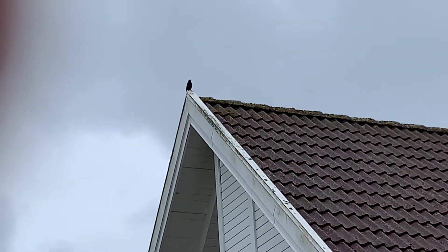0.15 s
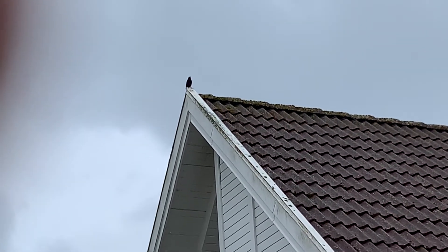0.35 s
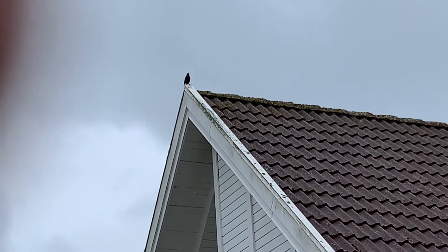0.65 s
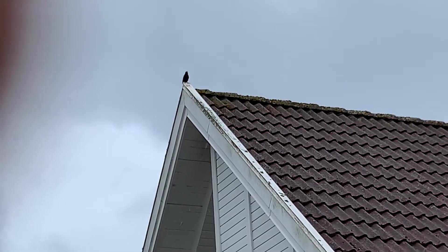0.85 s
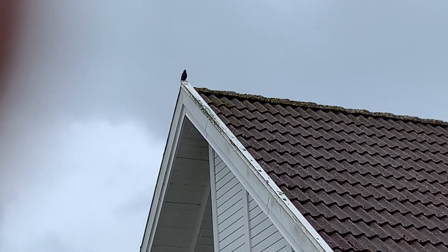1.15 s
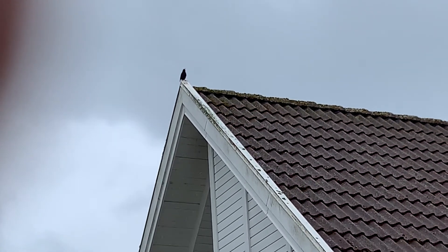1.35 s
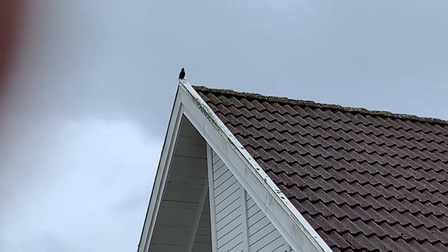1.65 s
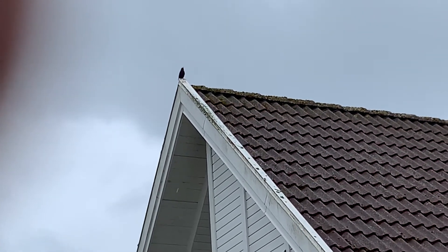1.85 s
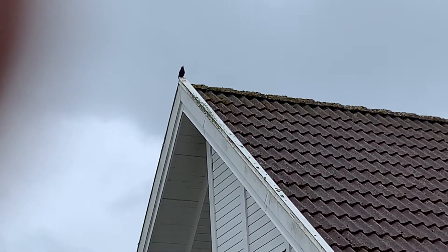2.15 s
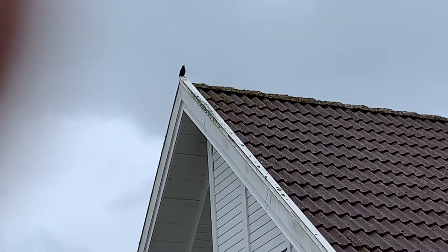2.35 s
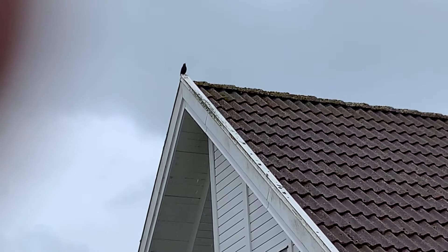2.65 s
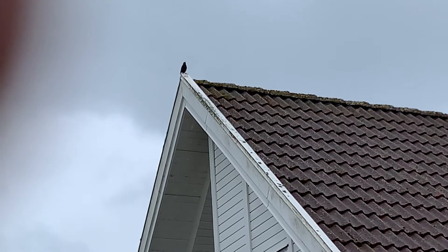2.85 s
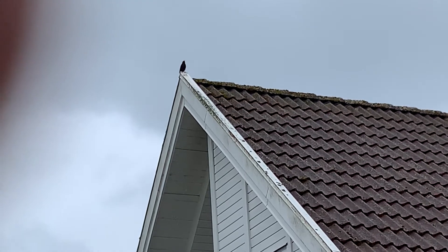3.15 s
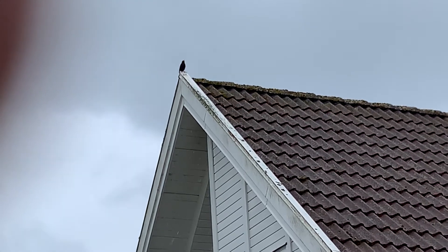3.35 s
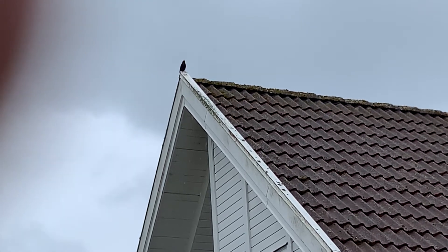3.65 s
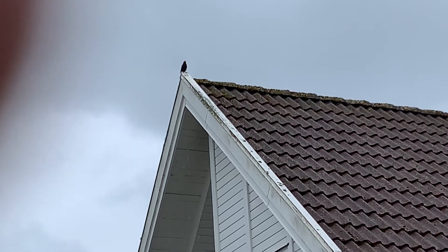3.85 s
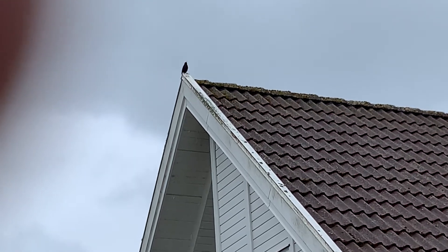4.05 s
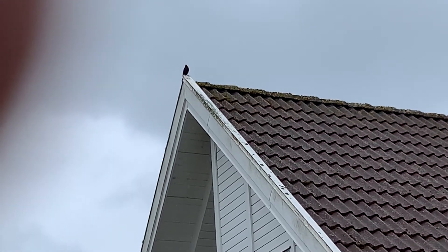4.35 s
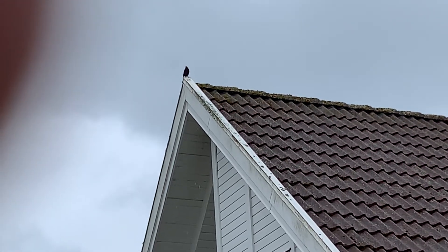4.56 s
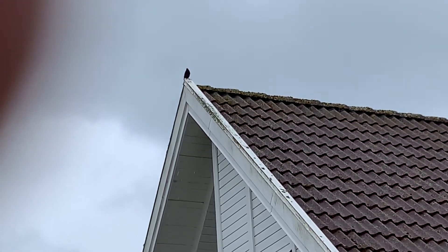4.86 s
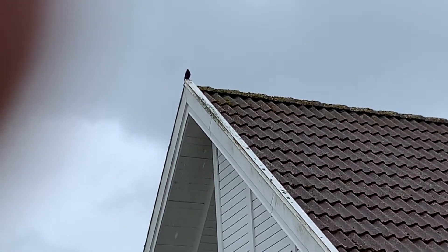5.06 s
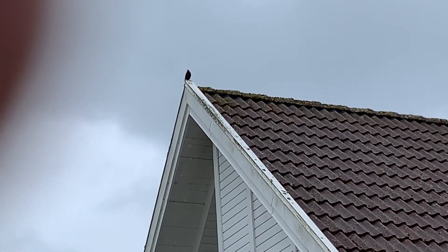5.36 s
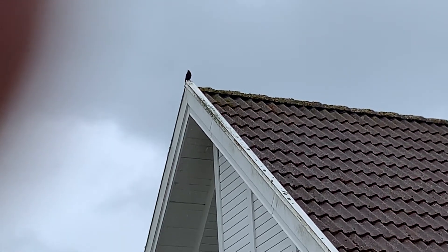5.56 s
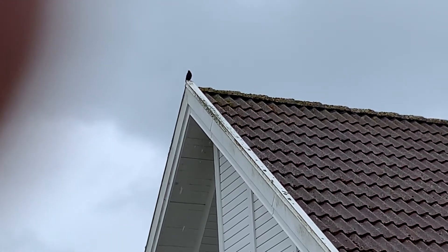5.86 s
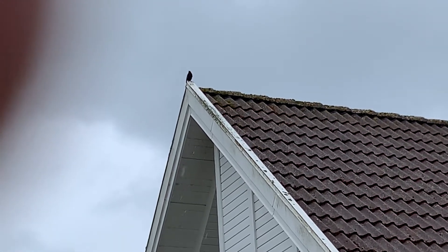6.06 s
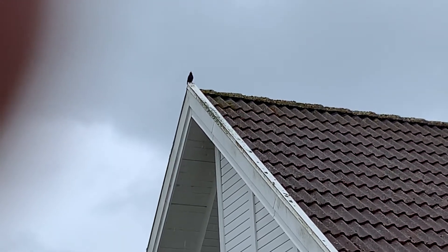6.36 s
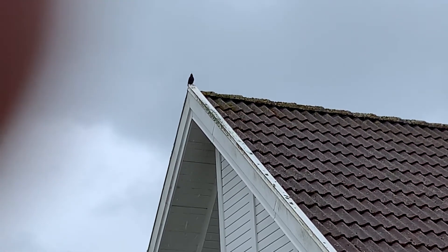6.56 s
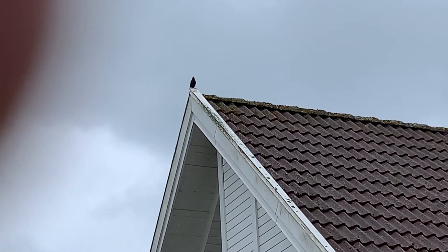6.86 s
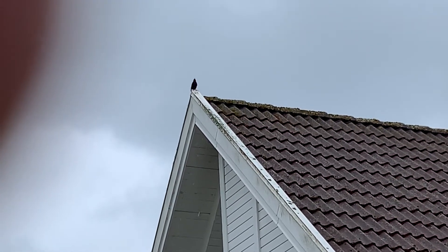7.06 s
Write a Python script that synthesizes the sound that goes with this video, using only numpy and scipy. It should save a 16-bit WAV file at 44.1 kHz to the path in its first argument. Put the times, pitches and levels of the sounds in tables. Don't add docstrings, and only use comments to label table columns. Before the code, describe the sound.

Mellow blackbird song in separated phrases with a brief high twitter, distant chirps echoing off houses, and low wind thumps growing stronger later.

```python
import sys
import numpy as np
from scipy import signal
from scipy.fft import rfft, irfft, next_fast_len
from scipy.io import wavfile
from scipy.ndimage import uniform_filter1d, map_coordinates

SR = 44100
rng = np.random.default_rng(int(sys.argv[2]) if len(sys.argv) > 2 else 0)


def boost_factor(decibels):
    exponent = np.asarray(decibels, float) / 20
    return 10 ** exponent


def int16_out(signal):
    q = np.round(np.clip(np.atleast_2d(signal).T, -1, 1) * 32767)
    wavfile.write(sys.argv[1], SR, q.astype(np.int16))


N = 317520


def unit(x):
    return x / np.sqrt(np.mean(x ** 2) + 1e-20)


def along(points, hz):
    f, v = np.transpose(points)
    return np.interp(np.log(hz + 1), np.log(f + 1), v)


def curves(rows, t):
    s, *cols = np.transpose(rows)
    return [np.interp(t, s, c) for c in cols]


def wobble(rate_hz, size=N):
    knots = rng.standard_normal(int(size * rate_hz / SR) + 4)
    return map_coordinates(knots, [np.arange(size) * rate_hz / SR])


def filtered(x, response):
    m = next_fast_len(x.shape[-1] + 8192)
    spectrum = rfft(x, m) * response(np.fft.rfftfreq(m, 1 / SR))
    return irfft(spectrum, m)[..., :x.shape[-1]]


def coloured(shape, colour):
    return filtered(rng.standard_normal(shape), lambda hz: boost_factor(along(colour, hz)))


def add(track, x, s):
    part = track[..., round(s * SR):][..., :x.shape[-1]]
    part += x[..., :part.shape[-1]]


def span(rows):
    return np.arange(rows[0][0], rows[-1][0], 1 / SR)


def edges(x):
    return x * signal.windows.tukey(len(x), min(0.0013 * SR / len(x), 1))


# f/Hz, level/dB per Hz
TOWN_COLOUR = [(150, -10.5), (250, -6.5), (595, -18.5), (887, -7.5), (1150, -13.5), (1840, -16.5),
               (2690, -21.5), (3680, -23.5), (5000, -30), (6400, -35), (8500, -36.5), (11000, -32),
               (12500, -30.5), (13800, -53.5), (15800, -50)]
# f/Hz, share [0-1]
TOWN_SHARE = [(300, 0.97), (700, 0.026), (3000, 0.043), (6000, 0.4), (8500, 0.39)]
# t/s, level/dB
TOWN_LEVEL = [(0.0, -71.5), (0.14, -72), (3.35, -73.5), (4.77, -75.5), (5.15, -74), (5.9, -76.5),
              (7.2, -71.5)]


def town():
    def share(hz):
        return np.clip(along(TOWN_SHARE, hz), 0, 1)

    def gain(hz):
        return boost_factor(along(TOWN_COLOUR, hz))

    shared = filtered(rng.standard_normal(N), lambda hz: gain(hz) * np.sqrt(share(hz)))
    own = filtered(rng.standard_normal((2, N)), lambda hz: gain(hz) * np.sqrt(1 - share(hz)))
    level_db = curves(TOWN_LEVEL, np.arange(N) / SR)[0] + 5 + 0.33 * wobble(2.3)
    return boost_factor(level_db) * unit(shared + own)


# t/s, level/dB
WIND_LEVEL = [(0.0, -65), (0.2, -50), (0.7, -65.5), (1.1, -51), (1.58, -56), (2.55, -60.5), (3.31, -48.5),
              (3.57, -56.5), (4.01, -56), (4.53, -47.5), (4.79, -43), (5.11, -58.5), (5.31, -40),
              (5.45, -32.5), (5.54, -33.5), (6.13, -41), (6.48, -43), (7.2, -41.5)]
# t/s, peak level/dB
GUST_PEAKS = [(.03, -50.5), (.29, -36), (0.891, -52.5), (1.398, -44.5), (1.69, -37.5), (1.88, -43.5),
              (2.222, -45), (3.331, -47.5), (4.2, -46), (4.389, -45), (4.581, -39), (4.95, -44),
              (5.101, -40), (5.369, -31), (6.24, -39), (6.401, -43), (6.56, -29), (6.66, -29.5),
              (6.72, -32), (6.93, -32), (7.2, -28.5)]
# t/s, peak level/dB, f/Hz
EDDIES = [(0.271, -38.5, 79), (0.305, -33.5, 58.4), (0.421, -54.5, 110.7), (1.094, -29.5, 74.2),
          (0.878, -47, 60), (1.363, -53, 79.7), (1.665, -50.5, 83), (3.255, -51, 94), (3.488, -46.5, 66),
          (4.169, -47.5, 64.5), (4.555, -49.5, 74.5), (4.832, -46, 74.9), (1.709, -32.5, 67),
          (2.218, -31.5, 86.4), (4.348, -50, 71.1), (5.091, -45.5, 91.4), (5.263, -34.5, 86.6),
          (5.282, -32.5, 77.7), (5.338, -30, 90), (5.407, -42, 125), (5.467, -35, 150), (5.486, -38.5, 120),
          (5.548, -42.5, 85), (5.833, -32.5, 148), (6.153, -56.5, 150), (6.225, -32, 76),
          (6.265, -48, 130.4), (7.016, -50.5, 147.4), (7.138, -44.5, 130), (5.437, -28, 93),
          (5.529, -35.5, 86.1), (5.604, -33, 91), (5.653, -28, 61.3), (5.691, -41, 62), (5.755, -27, 152.8),
          (5.816, -29, 89), (5.898, -30, 72.7), (6.034, -45, 62.5), (6.168, -33, 80), (6.488, -31, 146),
          (6.531, -29.5, 107), (6.588, -36, 128), (6.704, -33, 85.2), (6.79, -45, 88), (6.864, -63, 98),
          (6.94, -73.5, 84), (7.113, -55, 96.9), (7.169, -31.5, 117)]
# f/Hz, level/dB per Hz
BUFFET_COLOUR = [(11, -48), (18, -25), (48, 1.5), (70, 2.5), (100, -5), (146, -15.5), (200, -22),
                 (260, -57.5), (440, -120)]
# f/Hz, level/dB per Hz
FLUTTER_COLOUR = [(59, -33.5), (100, -4), (254, -10), (389, -26.5), (580, -48.5), (708, -64), (800, -67),
                  (1040, -101.5), (1760, -120)]


def buffeting(grid_s, steady_db):
    rise_db_s, fall_db_s = 182, 302
    low = coloured(N, BUFFET_COLOUR)
    swell = np.sqrt(np.abs(uniform_filter1d(unit(low) ** 2, size=1500)))
    low = low / (.35 + swell)
    s, db = np.transpose(GUST_PEAKS)[..., None]
    slope_db_s = np.where(grid_s < s, rise_db_s, fall_db_s)
    gusts = boost_factor(db - np.abs(grid_s - s) * slope_db_s)
    strength = boost_factor(steady_db) + gusts.sum(axis=0)
    return np.interp(np.arange(N) / SR, grid_s, strength) * unit(boost_factor(5.76 * wobble(14)) * low)


def flutter(grid_s, steady_db):
    base_db, growth = -59, 2.6
    stir_db, stir_tilt = -10.5, 1.7
    fast = coloured((3, N), FLUTTER_COLOUR)
    s, db, hz = np.transpose(EDDIES)[..., None]
    decay_s = np.where(grid_s < s, .004, .016)
    stirred = boost_factor(db + stir_db) * (hz / 90) ** stir_tilt * np.exp(-np.abs(grid_s - s) / decay_s)
    strength = boost_factor(base_db + growth * (steady_db + 39)) + stirred.sum(axis=0)
    noise = unit(boost_factor(2.2 * wobble(45)) * (fast[0] + 0.45 * fast[1:]))
    return np.interp(np.arange(N) / SR, grid_s, strength) * noise


def wind():
    grid_s = np.arange(0, N / SR, .001)
    steady_db, = curves(WIND_LEVEL, grid_s)
    out = buffeting(grid_s, steady_db) + flutter(grid_s, steady_db)
    t = np.arange(-.02, .06, 1 / SR)
    side = np.array([[.45], [-.45]])
    for (s, db, hz), (turn, lean) in zip(EDDIES, rng.standard_normal((len(EDDIES), 2))):
        cycles = hz * t
        puff = np.exp(-np.where(t < 0, 12 * cycles ** 2, 1.22 * cycles))
        bend = 1 + 0.74 * np.exp(-3 * (cycles + 0.37).clip(0))
        puff = puff * np.sin(2 * np.pi * cycles * bend + turn + side * lean * hz / 150)
        add(out, boost_factor(db + 5.5) * puff, max(s - .015, 0))
    return .16 * np.tanh(out / .16)


# f/Hz, left lead/rad
PORT_LEAD = [(300, 0), (1300, -1), (1900, -.6), (2100, -1.2), (2300, -2.3), (2460, -4.5), (2620, -6),
             (3050, -4.9), (4500, -6), (5650, -9.3), (6100, -12.4), (7100, -13), (8100, -15.3),
             (15400, -24.8)]
# f/Hz, left-right level/dB
PORT_TILT = [(1000, 1), (1850, 0.5), (2500, -1.5), (3300, 0.5), (5200, -5.5), (7000, -2.5), (9000, 1)]


def ports(x, turn=1):
    half = turn * np.array([[.5], [-.5]])
    f, lead = np.transpose(PORT_LEAD)

    def response(hz):
        return boost_factor(half * along(PORT_TILT, hz)) * np.exp(1j * half * np.interp(hz, f, lead))

    return filtered(x, response)


# f/Hz, t60/s
WALL_T60 = [(1500, 0.84), (3000, 0.47), (6000, 0.36), (9000, 0.25), (12000, 0.075)]
# delay/s, level/dB
HOUSE_FRONTS = [(.042, -13.5), (0.056, -19), (.096, -14.5)]


def echoes(x, gap_s, spread, wall_db, roof_db):
    slap_hz = 3200
    hz, t, z = signal.stft(rng.standard_normal((3, SR // 2)), SR, nperseg=256)
    fade = np.clip(5 - 10 * t, 0, 1)
    decay = boost_factor(-60 * t / along(WALL_T60, hz)[:, None])
    tail = signal.istft(z * fade * decay, SR, nperseg=256)[1]
    pair = np.pad(tail[0] + spread * tail[1:], ((0, 0), (int(gap_s * SR), 0)))
    pair *= boost_factor(wall_db) / np.linalg.norm(pair[0])

    bounces = rng.standard_normal((3, 1500)) ** 3
    tiles = (bounces[0] + .7 * bounces[1:]) * boost_factor(-60 * np.arange(1500) / SR / .06)
    pair[:, 40:1540] += boost_factor(roof_db) * tiles / np.linalg.norm(tiles[0])

    slap = signal.unit_impulse(400, 150) + .5 * tiles[:, :400] / np.linalg.norm(tiles[0, :400])
    slap = filtered(slap, lambda hz: 1 / (1 + 1j * hz / slap_hz) ** 4)
    for late_s, slap_db in HOUSE_FRONTS:
        add(pair, boost_factor(slap_db) * ports(slap, turn=-0.69), late_s)
    return signal.fftconvolve(x[None], pair, axes=1)


def far_bird(parts, calls, direct_db):
    out = np.zeros((2, N + 2 * SR))
    start = min(shape[0][0] for shape, *_ in parts)
    for s, level_db, factor in calls:
        call = np.zeros(SR // 3)
        for shape, rasp, rate_hz in parts:
            t = span(shape)
            hz, db = curves(shape, t)
            hz = factor * hz * (1 + rasp * wobble(rate_hz, size=len(t)))
            phase = 2 * np.pi * np.cumsum(hz) / SR
            level = boost_factor(level_db + db + 3.7 * wobble(120, size=len(t)))
            add(call, edges(level * np.sin(phase)), t[0] - start)
        add(out, boost_factor(direct_db) * call, 1 + s + start)
        heard = echoes(call, gap_s=.006, spread=1.0, wall_db=-1.0, roof_db=2.5)
        add(out, heard, 1 + s + start)
    return out[:, SR:SR + N]


# t/s, f/Hz, level/dB
CHIRP_SHAPE = [(-.05, 2060, -30), (-.024, 2213, -18), (-.012, 3130, -11), (-.004, 4050, 3), (.01, 3850, 4),
               (.035, 3400, 4), (.06, 2980, 2.5), (.088, 2600, -4), (.105, 2300, -14)]
# t/s, f/Hz, level/dB
CHIRP_RASP = [(-.07, 5550, -35), (-.045, 5860, -18.5), (-.015, 4540, -4.5), (.01, 5190, -24.5),
              (.06, 5140, -33.5), (.08, 4840, -37)]
# t/s, f/Hz, level/dB
CHIRP_HISS = [(-.055, 2813, -34), (-.03, 2821, -22), (-.01, 2900, -24.5)]
# t/s, level/dB, pitch factor
SPARROW_CALLS = [(.01, -47, 1), (0.895, -46.5, 1.01), (1.679, -48, 1.007), (2.477, -46.5, 1.048),
                 (3.215, -48.5, 1.007), (3.92, -49, 1), (4.611, -47, 1.01), (5.796, -48, 1),
                 (6.538, -47, 1.004)]


def sparrows():
    parts = [(CHIRP_SHAPE, .065, 600), (CHIRP_RASP, .16, 900), (CHIRP_HISS, .15, 900)]
    return far_bird(parts, SPARROW_CALLS, direct_db=-13)


# t/s, f/Hz, level/dB
FINCH_SHAPE = [(0, 4640, 7.5), (.008, 5485, -12), (.035, 5200, -4.5), (.055, 4590, -6), (.075, 4080, -3.5),
               (.12, 3600, -6.5), (.17, 3750, -11), (.27, 3750, -15.5)]
# t/s, level/dB, pitch factor
FINCH_CALLS = [(0.252, -55, 0.94), (1.942, -56, 0.92), (2.72, -58.5, 0.98), (4.029, -60, 0.95)]


def finch():
    return far_bird([(FINCH_SHAPE, .09, 500)], FINCH_CALLS, direct_db=-26)


# multiple, level/dB
OVERTONE_LEVELS = [(2, -19.5), (3, -29), (4, -38), (5, -42), (6, -35), (7, -50.5)]
# f/Hz, level/dB
BEAK_COLOUR = [(3300, 8), (5000, -15.5), (7000, 0.5), (8700, -3.5), (11000, 1), (13000, -1), (16000, -11.5)]
# f/Hz, level/dB
BREATH_COLOUR = [(1200, -58), (2600, -1.5), (4000, 2), (6500, -7), (9000, -13.5), (13000, -18.5),
                 (16000, -58)]


def voice(hz, db, half_db=-120, even_db=0, odd_db=0, high_db=0):
    breath_db = -47
    size = len(hz)
    swing = np.abs(hz - uniform_filter1d(hz, size=1200)) / hz
    jitter = (.004 + .05 * swing) * wobble(250, size=size)
    phase = 2 * np.pi * np.cumsum(hz * (1 + jitter)) / SR
    tone = np.sin(phase)
    leap_db = -.1 * uniform_filter1d(np.abs(np.gradient(np.log(hz))) * SR, size=130)
    lift_db = -.5 * np.clip(db + 32, -18, 14)
    for k, over_db in OVERTONE_LEVELS:
        open_db = (odd_db if k % 2 else even_db) + high_db * (k > 4)
        level_db = over_db + along(BEAK_COLOUR, k * hz) + lift_db + open_db + 2.5 * leap_db
        shaky_db = 4.5 * wobble(25, size=size) + k * wobble(200, size=size)
        blur = np.cumsum((.22 + 14 * swing) * wobble(300, size=size)) * 300 / SR
        tone += boost_factor(level_db + shaky_db) * (k * hz < 15900) * np.sin(k * phase + k * blur)
    halves = np.sin(1.5 * phase) + .7 * np.sin(2.5 * phase)
    tone += boost_factor(half_db + 3 * wobble(80, size=size)) * halves
    tone += boost_factor(breath_db + lift_db) * (1 + 40 * swing) * unit(coloured(size, BREATH_COLOUR))
    ragged_db = 35 * np.minimum(swing, .12) * wobble(220, size=size)
    level_db = db + leap_db + ragged_db + 0.53 * wobble(90, size=size)
    return edges(np.sqrt(2) * boost_factor(level_db) * tone)


def sung(rows, s=0, db=0, factor=1):
    attack_s, attack_db, release_s, release_db = .016, 20, 0.01, 33.5
    scoop, sag = 0.94, 0.85
    rows = np.array(rows) * [1, factor, 1] + [s, 0, db]
    attack = rows[0] * [1, scoop, 1] - [attack_s, 0, attack_db]
    release = rows[-1] * [1, sag, 1] + [release_s, 0, -release_db]
    return np.vstack([attack, rows, release])


WARBLE_SPANS = [(.443, .69, 95, 38.7, 2), (1.003, 1.115, 370, 35.5, 1), (1.34, 1.385, 30, 80, 6),
                (1.84, 1.93, 70, 70, 2), (6.643, 6.81, 60, 67, 7), (7.085, 7.18, 125, 38.5, -2.5)]


def warble(t):
    grow_s, settle_s, square_hz = .045, 0.036, 160
    hz, db = 0, 0
    for a, b, depth_hz, rate_hz, swing_db in WARBLE_SPANS:
        width = np.clip(np.minimum(.5 + (t - a) / grow_s, (b - t) / settle_s), 0, 1)
        square = depth_hz / square_hz
        beat = np.tanh(square * np.cos(2 * np.pi * rate_hz * (t - a))) / np.tanh(square)
        hz, db = hz + depth_hz * width * beat, db + swing_db * width * beat
    return hz, db


# t/s, f/Hz, level/dB
PHRASE_1 = [
    [(.435, 2180, -48), (.47, 2280, -40.5), (.5, 2207, -40), (.525, 2167, -32.5), (.56, 2043, -31),
     (.62, 1970, -34), (.66, 1933, -32), (.682, 1852, -36.5)],
    [(.758, 2414, -27.5), (.768, 2320, -26), (.8, 2094, -29), (.818, 1896, -42.5)],
    [(.895, 2502, -34.5), (.93, 2348, -25), (.965, 2336, -17), (.99, 2318, -28), (1.01, 2533, -26),
     (1.025, 2756, -27.5), (1.055, 2725, -22.5), (1.09, 2767, -26), (1.106, 2705, -32)],
]
PHRASE_2 = [
    [(1.255, 1630, -48), (1.32, 1670, -44.5), (1.338, 1748, -31.5), (1.365, 2057, -31.5),
     (1.39, 2000, -28.5), (1.406, 2002, -39.5), (1.425, 1898, -27.5), (1.452, 1835, -26),
     (1.478, 1763, -33.5)],
    [(1.556, 2845, -32.5), (1.565, 2800, -35), (1.582, 2758, -19.5), (1.595, 2564, -28.5),
     (1.603, 2420, -23)],
    [(1.69, 1897, -33), (1.72, 1893, -33.5), (1.75, 2056, -29.5), (1.84, 2184, -30.5), (1.88, 2360, -36),
     (1.905, 2416, -38.5)],
]
PHRASE_3 = [
    [(6.205, 1843, -45.5), (6.235, 1761, -40), (6.258, 1836, -43.5), (6.263, 1849, -39),
     (6.269, 2482, -28.5), (6.288, 2246, -29.5), (6.308, 1947, -36.5)],
    [(6.342, 2023, -38), (6.399, 2008, -36), (6.406, 1952, -47), (6.426, 1922, -49.5), (6.434, 1899, -34),
     (6.452, 1860, -40.5), (6.465, 1740, -52)],
    [(6.54, 2240, -49), (6.562, 2297, -31), (6.57, 2383, -22), (6.605, 2369, -26), (6.635, 2159, -31.5),
     (6.68, 2385, -41.5), (6.72, 2583, -37), (6.79, 2643, -29.5), (6.845, 2637, -24)],
    [(6.975, 1820, -55.5), (7.0, 1883, -38), (7.03, 1930, -46), (7.07, 1867, -30.5), (7.14, 1880, -35),
     (7.17, 1854, -29.5), (7.23, 1855, -29.5)],
]
# t/s, f/Hz, level/dB
TWITTER_END = [(2.48, 7260, -44.5), (2.501, 6970, -32), (2.54, 6610, -29.5), (2.575, 5730, -38),
               (2.608, 5140, -41.5), (2.616, 4560, -55.5)]
# even, odd, fifth and higher overtones, level/dB each
BEAK_OPENING = [(-1.5, 3, -0.5), (2.5, 1.5, -10.5), (2.5, 2.5, -9.5), (-3, 3, 3), (1.5, 2.5, -5.5),
                (-10.5, -2.5, 7), (6, 0.5, -30), (3, 0.5, -9), (-7.5, 3, 0.5), (-2, 0, 3.5), (3.5, -5.5, 0)]
# from t/s, to t/s, level/dB
DOUBLINGS = [(1.58, 1.602, -26), (6.771, 6.828, -38), (7.025, 7.09, -59)]
# t/s, f/Hz, level/dB
LOOP_MOTIF = [(.003, 5920, -58.5), (.01, 6580, -39.5), (.026, 8700, -42.5), (.034, 7940, -35.5),
              (.041, 6510, -29.5), (.045, 6970, -35.5)]
RISE_MOTIF = [(.003, 3867, -53.5), (.011, 4377, -37.5), (.026, 5346, -39.5), (.034, 5044, -35.5),
              (.049, 5265, -46)]
# t/s, f/Hz, level/dB
OTHER_SIDE = [(.01, 4710, -47.5), (.021, 5586, -37), (.034, 5850, -44), (.05, 5745, -48.5)]
# t/s, level/dB, pitch factor
LOOP_TIMES = [(2.009, 0, 0.98), (2.134, -4.5, 0.99)]
# t/s, level/dB, pitch factor, other side level/dB
RISE_TIMES = [(2.236, 0.5, 1.0, 2), (2.349, -1.5, 1.06, -5)]


def blackbird():
    roof_db = -7
    out = np.zeros((2, N + SR))
    lower_side, other_side = np.zeros((2, N + SR))
    fluted = PHRASE_1 + PHRASE_2 + PHRASE_3 + [TWITTER_END]
    notes = [(sung(rows), opening) for rows, opening in zip(fluted, BEAK_OPENING)]
    notes += [(sung(LOOP_MOTIF, *row), ()) for row in LOOP_TIMES]
    notes += [(sung(RISE_MOTIF, *row[:3]), ()) for row in RISE_TIMES]
    for rows, opening in notes:
        t = span(rows)
        hz, db = curves(rows, t)
        swing_hz, swing_db = warble(t)
        half_db = -120 + sum((level + 124.5) * (t > a) * (t < b) for a, b, level in DOUBLINGS)
        half_db = uniform_filter1d(half_db, size=500)
        note = voice(hz + swing_hz, db + swing_db, half_db, *opening)
        add(lower_side, note, t[0])
        add(out, note, t[0])
        add(out, echoes(note, gap_s=.02, spread=1.0, wall_db=-14.0, roof_db=roof_db), t[0])

    for s, _, factor, db in RISE_TIMES:
        rows = sung(OTHER_SIDE, s, db, factor)
        add(other_side, voice(*curves(rows, span(rows))), rows[0][0])
    a, b = np.flatnonzero(other_side)[[0, -1]]
    high_pass = signal.butter(4, 8000, "high", fs=SR, output="sos")
    sum_tone = signal.sosfilt(high_pass, lower_side[a:b] * other_side[a:b])
    upper = other_side[a:b] + boost_factor(27.5) * sum_tone
    add(out, upper, a / SR)
    add(out, echoes(upper, gap_s=0.012, spread=0.786, wall_db=-9.0, roof_db=roof_db), a / SR)
    return out[:, :N]


# t/s, f/Hz, level/dB
MURMUR_SHAPE = [(0, 2494, -11.5), (.08, 2700, -9.5), (.15, 2300, -6.5), (.19, 2334, 0.5)]


def far_blackbird():
    calls = [(3.58, -71.5, 0.96), (3.7, -68, 0.99), (4.2, -79.5, 0.88)]  # t/s, level/dB, pitch factor
    return far_bird([(MURMUR_SHAPE, .1, 250)], calls, direct_db=-35.0)


# t/s, f/Hz, level/dB
SEEP_SHAPE = [(0, 4340, -9), (.05, 4500, -4), (.1, 4520, -8), (.13, 4500, -7)]


def thin_notes():
    calls = [(3.75, -81, 1.0), (5.0, -78, .615), (5.12, -77, .6)]  # t/s, level/dB, pitch factor
    return far_bird([(SEEP_SHAPE, .01, 200)], calls, direct_db=-8)


def scene():
    ahead = town() + sparrows() + finch() + blackbird() + far_blackbird() + thin_notes()
    return ports(ahead) + wind()


def roll_off(x):
    return signal.sosfilt(signal.butter(12, 15850, fs=SR, output="sos"), x)


def record(dry):
    return roll_off(dry)


dry = scene()
out = record(dry)
int16_out(out)
```